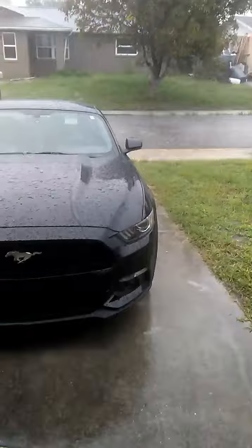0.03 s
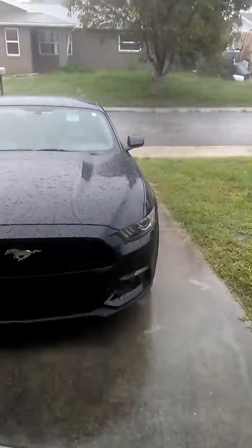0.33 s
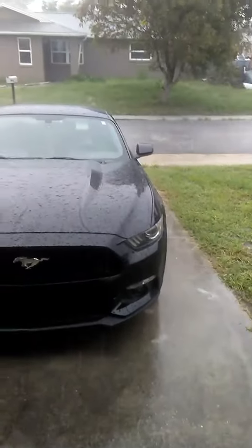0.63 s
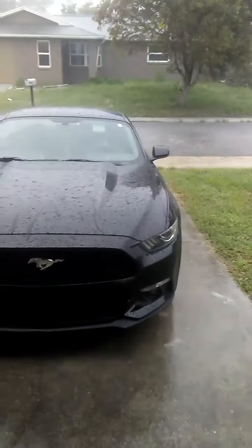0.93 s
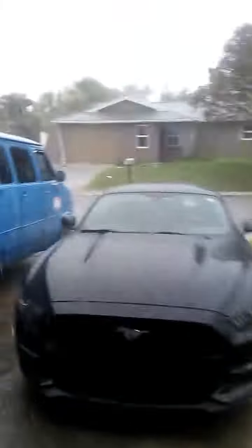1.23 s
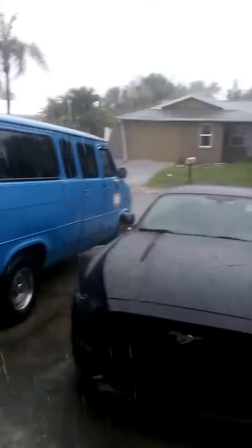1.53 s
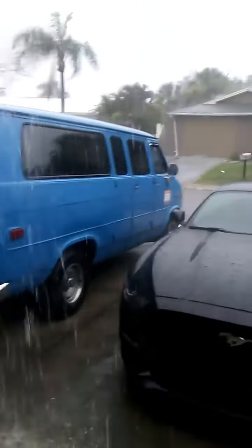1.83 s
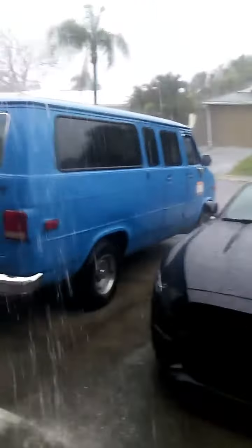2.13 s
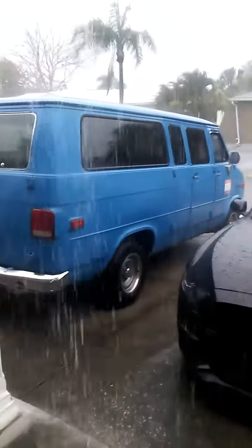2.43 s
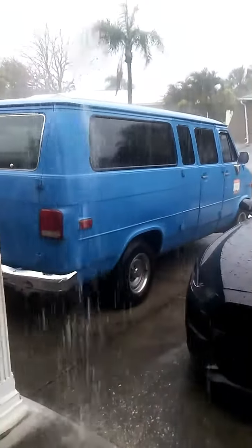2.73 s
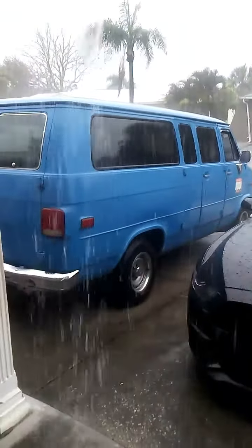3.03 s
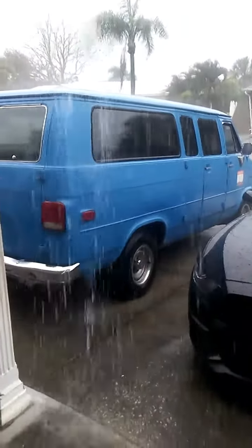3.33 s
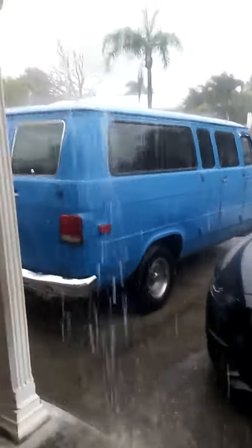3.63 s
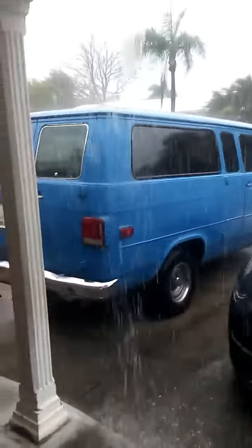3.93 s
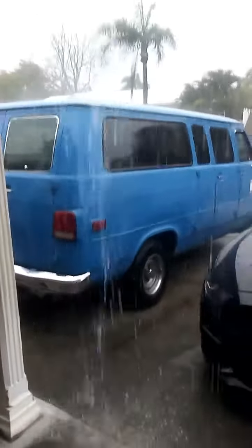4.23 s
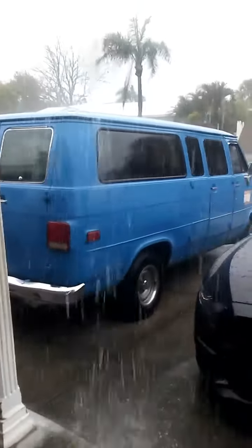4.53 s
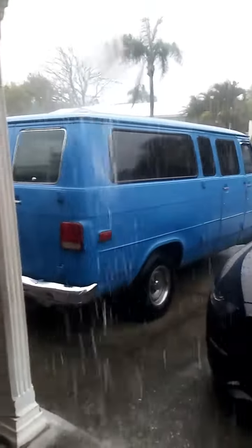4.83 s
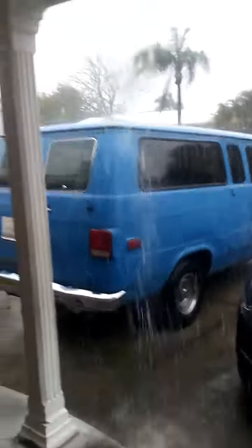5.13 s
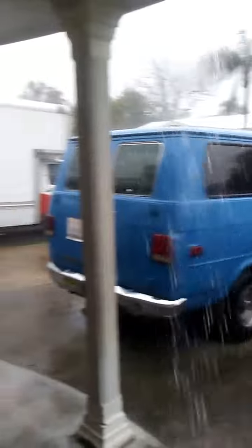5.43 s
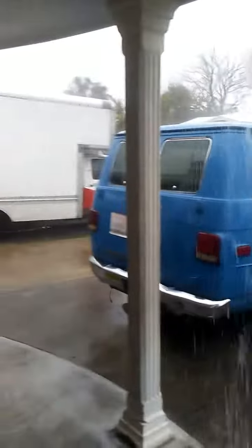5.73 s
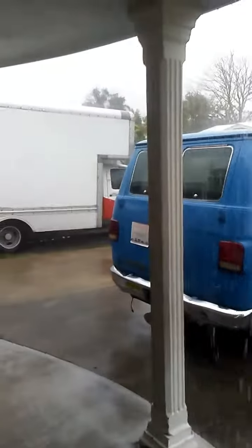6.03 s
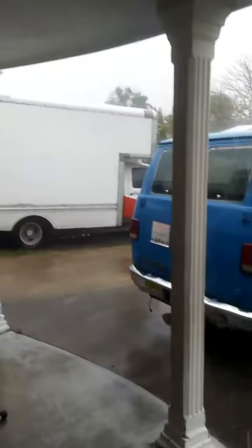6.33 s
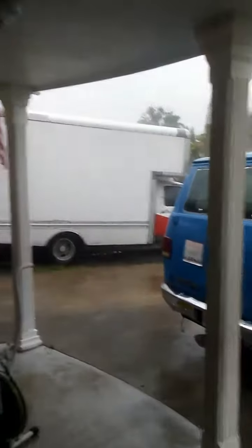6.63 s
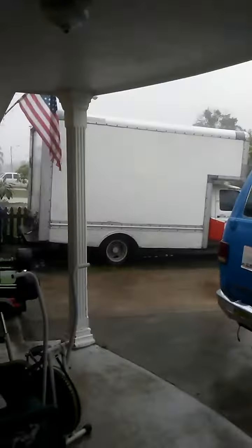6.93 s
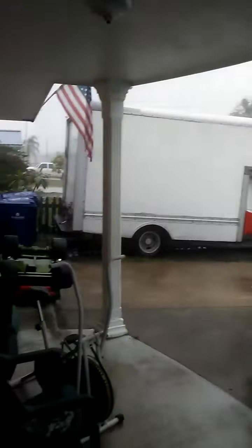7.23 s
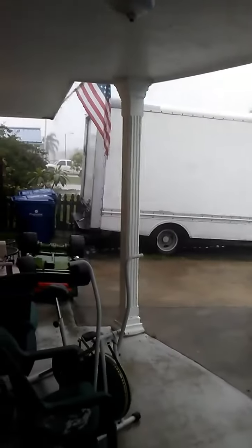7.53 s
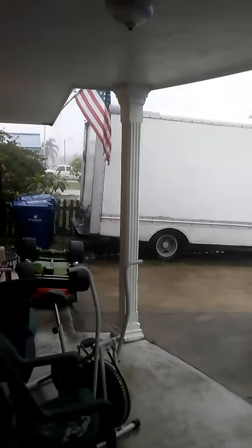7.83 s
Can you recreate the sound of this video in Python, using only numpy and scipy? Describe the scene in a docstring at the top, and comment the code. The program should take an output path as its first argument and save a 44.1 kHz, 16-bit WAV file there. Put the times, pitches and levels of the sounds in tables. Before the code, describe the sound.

Heavy rain is heard from a porch, beginning abruptly after a brief silence. Water running off the roof edge spatters on a concrete driveway with a bright, steady hiss of fine droplets. Bigger drops splat irregularly, slap into puddles and make small plinks. Behind this lies a soft, low wash of distant rain, with one dull tap early on and a few faint hollow drips on parked cars midway.

```python
"""Roof runoff spatters on a concrete driveway in heavy rain, heard in mono from a porch.
Fine droplets tick and hiss; gobs burst on the concrete, slap into puddles and glug as they trap bubbles.
Behind them far rain washes over the street and drums on cars; one dull tap sounds close by.
The listener faces the lawn, turns to the runoff, then steps back under the roof, and the colour follows."""
import sys
import numpy as np
from scipy import signal
from scipy.fft import rfft, irfft, next_fast_len
from scipy.io import wavfile
from scipy.ndimage import uniform_filter1d, map_coordinates

SR = 44100
rng = np.random.default_rng(int(sys.argv[2]) if len(sys.argv) > 2 else 0)


def to_wav(s):
    """Save 16-bit WAV."""
    ch = np.atleast_2d(s).T  # columns
    pcm = np.round(np.clip(ch, -1, 1) * 32767)  # PCM
    wavfile.write(sys.argv[1], SR, pcm.astype(np.int16))


N = 352359

# gobs slapping into puddles: t/s, level/dB, f/Hz
PUDDLE_SLAPS = [(0.7164, -14, 4700), (0.9347, -14, 4670), (1.431, -8, 4870), (1.7447, -15.5, 4740),
                (2.2405, -17, 4330), (2.3199, -15, 4610), (2.762, -9.5, 4840), (2.781, -16, 4720),
                (3.1954, -15.5, 4240), (3.2288, -18, 3140), (3.9328, -14.5, 3410), (3.9713, -23, 4590),
                (4.4056, -11, 4960), (5.2895, -11, 4640), (5.5508, -15.5, 4200), (5.9541, -17, 3430),
                (6.1988, -17.5, 2830), (6.2733, -16.5, 3420), (6.7773, -17.5, 3490), (6.8333, -16.5, 3320),
                (6.9976, -18.5, 3390), (7.1584, -8, 4850), (7.9142, -21, 2960)]
# gobs bursting on bare concrete: t/s, level/dB, f/Hz
CONCRETE_BURSTS = [(0.985, -3, 6320), (1.1444, -3, 5400), (1.2329, 0.5, 5870), (1.3881, -1.5, 6540),
                   (1.4298, -0.5, 6820), (1.8605, -3, 7560), (2.0151, 0.5, 7370), (2.085, -1, 7250),
                   (2.5341, -6, 7370), (2.8482, -6, 7360), (3.034, -3.5, 6890), (3.2286, 0, 7700),
                   (3.395, -11, 7300), (3.8764, -2, 6770), (4.067, -1.5, 7700), (4.3001, 0, 8270),
                   (4.3972, 1, 6600), (4.7988, -1.5, 8100), (4.8738, -1.5, 8800), (5.2894, -2.5, 8300),
                   (6.5568, -2, 6960), (6.9501, 0.5, 7100), (6.9886, -9, 6840), (7.0888, -4, 8880),
                   (7.1581, -0.5, 5360), (7.359, 1, 7560), (7.6046, -1, 8870)]


def amp(db):
    """Decibels to gain."""
    return 10 ** (np.asarray(db) / 20)


def unit(x):
    """Scale to rms 1."""
    return x / np.sqrt(np.mean(x ** 2) + 1e-20)


def curve(rows):
    """Automation through (time, value) breakpoints, one value a sample."""
    return np.interp(np.arange(N) / SR, *np.transpose(rows))


def wobble(rate):
    """A smooth random curve with rate knots a second."""
    knots = rng.standard_normal(int(N * rate / SR) + 4)
    return map_coordinates(knots, [np.arange(N) * rate / SR])


def filtered(x, response):
    """Filter x by a complex response of frequency."""
    size = next_fast_len(len(x) + 8192, True)
    return irfft(rfft(x, size) * response(np.fft.rfftfreq(size, 1 / SR)), size)[:len(x)]


def resonance(f, hz, width):
    """Response of one damped mode."""
    return 1j * f * width / (hz * hz - f * f + 1j * f * width)


def log_response(points, f):
    """Log gain and phase of a causal EQ through (f/Hz, level/dB) points; clicks keep their sharp front."""
    hz, db = np.transpose(points)
    shape_db = np.interp(np.log(f + 1), np.log(hz), np.maximum(db, -70))
    cepstrum = irfft(np.log(amp(shape_db)))
    cepstrum[1:len(f) - 1] *= 2
    cepstrum[len(f):] = 0
    return rfft(cepstrum)


def heard_from(x, place, spectra, levels_db):
    """Morph the EQ and level of x as the listener moves between places."""
    f, t, z = signal.stft(x, SR, nperseg=4096)
    here = np.interp(t, np.arange(N) / SR, place)
    colour = np.exp(sum(np.outer(log_response(points, f), np.clip(1 - abs(here - k), 0, 1))
                        for k, points in enumerate(spectra)))
    coloured = signal.istft(z * colour / np.linalg.norm(colour, axis=0), nperseg=4096)[1][:N]
    return amp(np.interp(place, np.arange(len(levels_db)), levels_db)) * unit(coloured)


def patchy(x, depth_db, size):
    """Each handful of water has its own colour: random gain over patches of frequency and time."""
    z = signal.stft(x, nperseg=size)[2]
    field = uniform_filter1d(rng.standard_normal(z.shape), size=10, axis=0)
    field = uniform_filter1d(field, size=6, axis=1)
    return signal.istft(z * amp(depth_db * unit(field)), nperseg=size)[1][:N]


def drops(count, rate, spread_db):
    """count samples of random impacts of mixed sizes, rate a second; rms 1."""
    lands = rng.random(count) < rate / SR
    sizes = amp(spread_db * np.clip(rng.standard_normal(count), -3, 2.6))
    return unit(lands * sizes * rng.choice([-1, 1], count))


def droplets(rate, low_hz, high_hz, cycles, spread_db):
    """Tiny pings, each a damped sine of its own pitch that lasts a few cycles; rms 1."""
    when, pitch, life, size = rng.random((int(rate * N / SR), 4)).T[:, :, None]
    hz = low_hz + (high_hz - low_hz) * pitch
    k = np.arange(256)
    turns = hz * k / SR
    decay = np.exp(-turns / (cycles * (0.5 + life)))
    pings = amp(-spread_db * np.log(size + 0.021)) * np.sin(2 * np.pi * turns) * decay
    return unit(np.bincount(((when * N).astype(int) + k).ravel(), pings.ravel(), N)[:N])


def clumps(rate, life_s, share):
    """Gain for runoff falling in gobs: each throws up a sudden cloud of droplets that thins out."""
    gobs = (rng.random(N) < rate / SR) * rng.exponential(1, N)
    density = signal.lfilter([1], [1, -np.exp(-1 / (life_s * SR))], gobs)
    return np.sqrt(1 - share + share * density / density.mean())


def gathering(gobs, swell_s=0.05):
    """0 to 1: how much water the roof edge holds back while the next gob swells."""
    landings = np.array([s for s, *_ in gobs] + [np.inf])
    t = np.arange(N) / SR
    wait = landings[np.searchsorted(landings, t)] - t
    return np.exp(-wait / swell_s)


def splashes(rows, gain_db, rise, t60, width_share, rate):
    """Each gob lands and scatters into a dying shower of droplets around its own pitch."""
    out, t = np.zeros(N + SR), np.arange(SR // 4) / SR
    shower = (1 - np.exp(-t / rise)) * amp(-60 * t / t60)
    for s, db, hz in rows:
        ticks = drops(len(t), rate, spread_db=3.5) + 0.8 * rng.standard_normal(len(t))
        wet = unit(filtered(ticks, lambda f: resonance(f, hz, width_share * hz) ** 4))
        out[round(s * SR):][:len(t)] += amp(db + gain_db) * shower * wet
    return out[:N]


def rings(rows, gain_db, attack, t60, glide, scatter, lag):
    """Each drop rings, rising a little as it fades; three weaker, detuned rings follow within the lag."""
    out, t = np.zeros(N + SR), np.arange(SR // 4) / SR
    decay = (1 - np.exp(-t / attack)) * amp(-60 * t / t60)
    for s, db, hz in rows:
        for k, (late, detune) in enumerate(rng.random((4, 2))):
            follower = k > 0
            pitch = hz * (1 + follower * scatter * (2 * detune - 1))
            tone = np.sin(2 * np.pi * pitch * t * (1 + glide * t / t60))
            onset = round((s + follower * late * lag) * SR)
            out[onset:][:len(t)] += amp(db + gain_db - 6.4 * follower) * decay * tone
    return out[:N]


def far_rain(place):
    """Countless drops on street, roofs and cars merge into a wash; the porch rings a little."""
    # EQ in the open, at the roof edge and under the roof: f/Hz, level/dB
    open_eq = [(15, -47), (25, -21), (59, 0.5), (91, -1), (290, 1), (360, -1.5), (470, 1.5), (638, -2),
               (710, -1), (896, -4), (1800, -2.5), (2340, -0.5), (3960, -120)]
    edge_eq = [(15, -45), (25, -24), (54, 1), (91, -12), (127, -3), (199, -6.5), (265, -4), (379, -5),
               (454, -3), (749, -8), (896, -10.5), (1240, -10), (1480, -12), (1800, -6.5), (2340, -28),
               (3960, -120)]
    roof_eq = [(15, -33), (25, -19), (48, 0), (86, -5.5), (123, 1), (199, -2), (230, -1), (335, -1.5),
               (366, -10), (446, 0), (563, -9.5), (980, -4), (1150, -4), (1560, -7.5), (1800, -9),
               (2340, -30), (3960, -120)]
    # fader at each place: level/dB
    faders = [-26.1, -35, -33, -32]
    # hollow porch resonances: f/Hz, width/Hz, level/dB
    porch_modes = [(56, 8.4, -5), (117, 10, -8), (228, 13, -11.5), (466, 26, -6.5)]
    rain = unit(rng.standard_normal(N) + amp(-7.5) * drops(N, rate=300, spread_db=5.5))
    rain = patchy(rain, depth_db=1.88, size=2048)
    wash = heard_from(rain, place, [open_eq, edge_eq, edge_eq, roof_eq], levels_db=[0])  # EQ only
    ring = filtered(wash, lambda f: sum(amp(db) * resonance(f, hz, width) for hz, width, db in porch_modes))
    level_db = np.interp(place, range(4), faders) + 1.14 + 0.71 * wobble(10)
    return amp(level_db) * unit(wash + 0.48 * ring)


def car_drumming(light_per_s=2, low_hz=246, high_hz=603):
    """Drops ring the panels of the cars: a few heavy ones among lighter ones at random moments."""
    # heavy, hollow hits: t/s, level/dB, f/Hz
    heavy = [(2.712, -20, 476), (3.57, -19, 422), (4.11, -21, 473), (4.496, -20, 452), (5.003, -21, 445),
             (5.488, -16.5, 336), (5.917, -16.5, 226), (6.063, -19.5, 312)]
    light = [(when * N / SR, -33 + 6 * size, low_hz + (high_hz - low_hz) * pitch)
             for when, size, pitch in rng.random((int(light_per_s * N / SR), 3))]
    hits = list(heavy) + light
    return rings(hits, gain_db=-3, attack=0.0019, t60=0.097, glide=0.033, scatter=0.223, lag=0.035)


def tap(gain_db=6):
    """A single close, dull tap with no ring."""
    # the hit: t/s, level/dB
    hit = [(1.591, -10.5)]
    s, db = hit[0]
    push = np.zeros(N)
    push[round(s * SR)] = 1
    knock = filtered(push, lambda f: resonance(f, hz=600, width=1400) ** 2)
    return amp(db + gain_db) * knock / abs(knock).max()


def puddle_patter(place):
    """Runoff patters in the puddles and small bubbles ping; the patter thins before each slap."""
    # EQ in the open, at the roof edge and under the roof: f/Hz, level/dB
    open_eq = [(820, -33), (1400, -11), (1860, 0), (2060, -6), (2410, 2.5), (3040, -1), (4400, -4),
               (5720, -34), (9680, -120)]
    edge_eq = [(820, -40.5), (1400, -8.5), (1610, -13.5), (1880, 1), (2260, 1), (2660, -4.5), (2960, -2),
               (3650, -4.5), (4400, -1.5), (5720, -30), (9680, -120)]
    roof_eq = [(820, -34), (1400, -7), (1890, 4.5), (2110, -2.5), (2380, -5.5), (2460, -6.5), (3360, 0),
               (3900, -7.5), (4400, -4.5), (5720, -49), (9680, -120)]
    # fader at each place: level/dB
    faders = [-25, -30.5, -29, -32]
    # the stream wandering in and out of the puddles: t/s, level/dB
    wander = [(0.6, 0.5), (1.5, 0), (1.76, -1), (2.1, -4), (2.3, 3), (2.6, -2), (2.85, 1.5), (3.12, -2),
              (3.42, -3.5), (3.75, 1.5), (4.45, -0.5), (4.75, 1.5), (5.25, 1), (5.8, -3), (6, -0.5),
              (6.4, 0.5), (7.2, 2), (7.8, -1.5)]
    flow_db = curve(wander) + wobble(12) - 2.5 * gathering(PUDDLE_SLAPS)
    bubbles = droplets(rate=900, low_hz=1515, high_hz=4484, cycles=5, spread_db=0.5)
    impacts = drops(N, rate=1800, spread_db=9)
    hits = unit(impacts + amp(-3.5) * bubbles + amp(4.5) * rng.standard_normal(N))
    hits = patchy(hits * clumps(rate=55, life_s=0.0071, share=0.22), depth_db=1.86, size=512)
    return amp(flow_db - 1.14) * heard_from(hits, place, [open_eq, edge_eq, edge_eq, roof_eq], faders)


def glugs():
    """A gob in deep water traps bubbles: a few plink, the rest froth around the same pitch."""
    # gobs in the deepest puddle: t/s, level/dB, f/Hz
    gobs = [(0.753, -8.5, 2410), (1.3212, -14, 1980), (2.949, -17.5, 1870), (3.518, -17, 2220),
            (4.1354, -11.5, 2140), (4.3066, -9.5, 2110), (4.5798, -16.5, 2190), (5.0063, -19, 2270),
            (5.424, -15.5, 2200), (5.921, -12, 1890), (7.1061, -18, 1870), (7.3961, -16, 2190),
            (7.56, -11.5, 2300)]
    plinks = rings(gobs, gain_db=-3, attack=0.00059, t60=0.015, glide=0.04, scatter=0.16, lag=0.018)
    return plinks + splashes(gobs, gain_db=-9, rise=0.0017, t60=0.18, width_share=0.59, rate=2500)


def slaps(smack_hz=3020):
    """A gob smacks the puddle flat, then rains back onto it."""
    contacts = [(s, db, smack_hz) for s, db, _ in PUDDLE_SLAPS]
    smack = splashes(contacts, gain_db=-12.5, rise=0.001, t60=0.11, width_share=0.88, rate=2000)
    shower = splashes(PUDDLE_SLAPS, gain_db=-7, rise=0.00083, t60=0.18, width_share=1.04, rate=2200)
    return smack + shower


def bursts():
    """A gob hits bare concrete and bursts into bright droplets."""
    return splashes(CONCRETE_BURSTS, gain_db=-12.5, rise=0.00082, t60=0.17, width_share=0.88, rate=2600)


def concrete_spray(place):
    """Fine droplets tick and ping on concrete over a hiss of farther ones, thinning before each burst."""
    # EQ at each place: f/Hz, level/dB
    lawn_eq = [(2120, -46), (3600, -16.5), (4280, -14), (4630, -9), (5340, -4), (6310, -2), (7400, -7),
               (10700, -12.5), (12800, -20.5), (14400, -29), (15700, -34)]
    runoff_eq = [(2120, -33), (3600, -24), (4610, -10), (5540, -11.5), (6150, -5), (7450, 1), (9470, -4),
                 (11700, -5.5), (13100, -13), (15700, -27)]
    post_eq = [(2120, -51), (3600, -19.5), (4100, -21), (4490, -12), (5050, -10), (5540, -2), (6270, -3),
               (8270, 1), (9300, -3.5), (12000, -5.5), (12900, -10.5), (15700, -29)]
    roof_eq = [(2120, -18), (3600, -15), (4280, -9), (4690, -10.5), (5540, -6), (6350, -4), (7000, 0.5),
               (8320, 1.5), (9360, -1), (12000, -1.5), (13700, -3), (15000, -2), (15700, -27)]
    # fader at each place: level/dB
    faders = [-14.5, -17, -16.5, -18.5]
    # how hard the roof sheds water, faltering now and then: t/s, level/dB
    runoff = [(0.6, 0.1), (1.45, -1), (1.8, -1), (2.35, 0.5), (3.45, 0.2), (3.92, 1.5), (4.03, -0.5),
              (4.35, 1), (4.88, 0.5), (4.96, -1.5), (5.47, -0.5), (5.7, 0.7), (6.55, 0.3), (7.2, -0.4),
              (7.32, -5), (7.58, 1.5), (7.7, -3.5), (7.98, -2.5)]
    flow_db = curve(runoff) + 0.54 * wobble(12) - 0.4 * gathering(CONCRETE_BURSTS)
    pings = droplets(rate=1500, low_hz=4360, high_hz=12040, cycles=3.3, spread_db=4)
    impacts = drops(N, rate=4000, spread_db=3)
    ticks = unit(impacts + amp(-2.5) * pings + amp(2.9) * rng.standard_normal(N))
    ticks = patchy(ticks * clumps(rate=80, life_s=0.013, share=0.31), depth_db=1.03, size=512)
    return amp(flow_db) * heard_from(ticks, place, [lawn_eq, runoff_eq, post_eq, roof_eq], faders)


def scene():
    """Beds that follow the listener, plus single hits; the same in both channels."""
    # listener's path: t/s, place (0 facing the lawn, 1 facing the runoff, 2 by the post, 3 under the roof)
    path = [(0.6, 0), (1.15, 0.15), (1.48, 0.02), (1.69, 1), (2.6, 1), (3.3, 1.2), (4.1, 1.76), (4.75, 2),
            (5.7, 2.55), (6.6, 3), (7.4, 2.5), (7.9, 2.5)]
    place = curve(path)
    beds = far_rain(place) + puddle_patter(place) + concrete_spray(place)
    mono = beds + car_drumming() + tap() + glugs() + slaps() + bursts()
    return np.array([mono, mono])


def record(dry):
    """Soft-clip the peaks, trim the deep bass and the very top, and open sharply out of silence."""
    ceiling, low_cut_hz, top_hz = 0.8, 33, 15750
    start_s, fade_s = 0.5805, 0.001
    rounded = dry / (1 + abs(dry / ceiling) ** 6) ** (1 / 6)
    band = lambda f: (f < top_hz) * f ** 2 / np.sqrt(f ** 4 + low_cut_hz ** 4)
    fade_in = np.clip((np.arange(N) / SR - start_s) / fade_s + 0.5, 0, 1)
    return np.array([filtered(channel, band) for channel in rounded]) * fade_in


dry = scene()
out = record(dry)
to_wav(out)
```